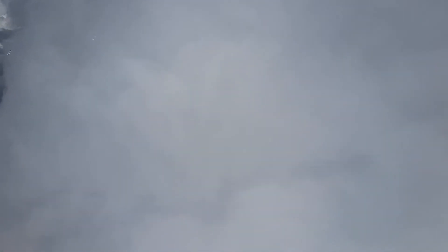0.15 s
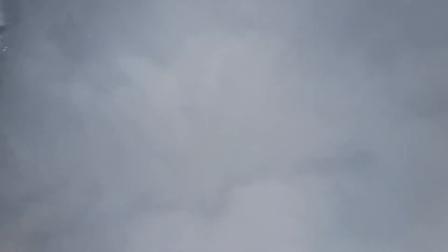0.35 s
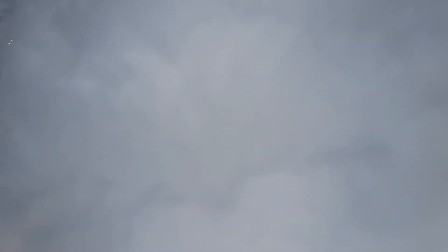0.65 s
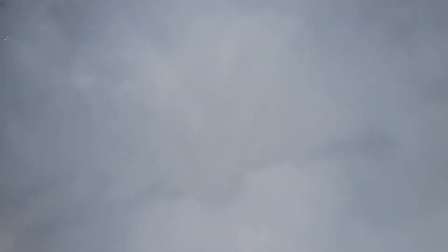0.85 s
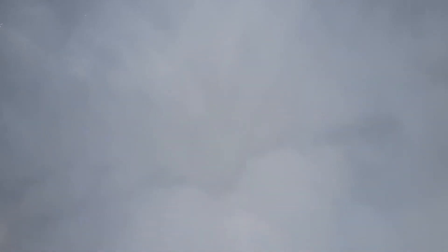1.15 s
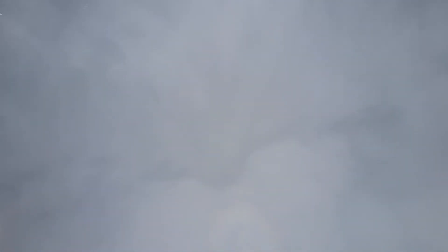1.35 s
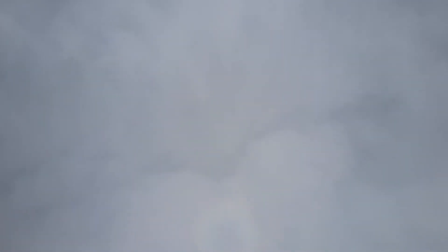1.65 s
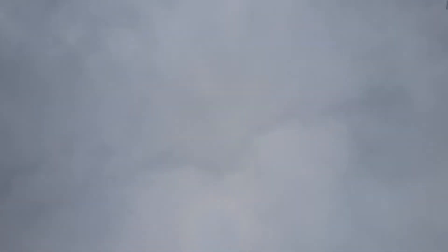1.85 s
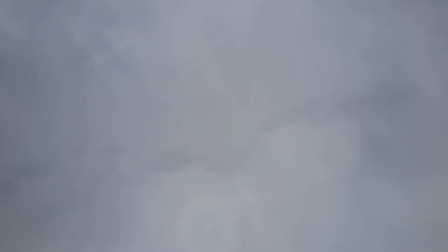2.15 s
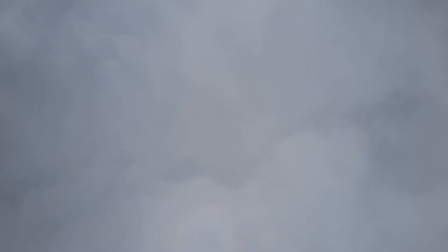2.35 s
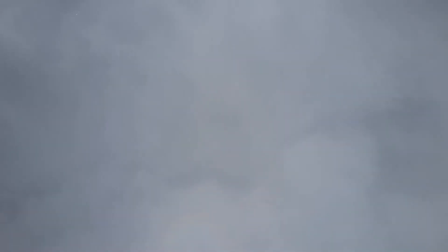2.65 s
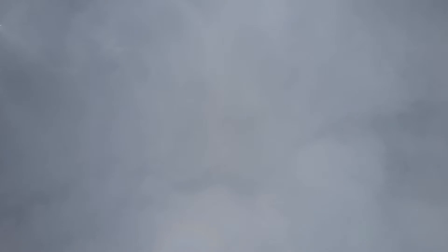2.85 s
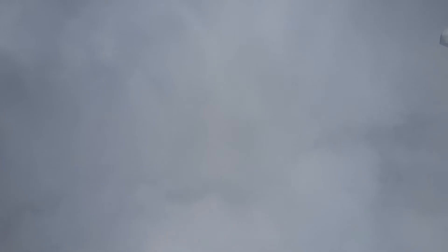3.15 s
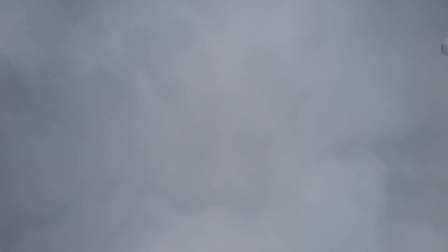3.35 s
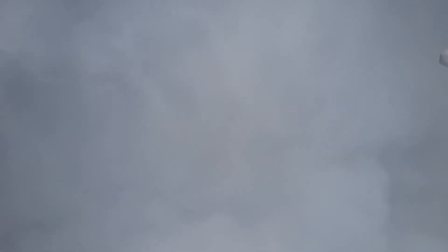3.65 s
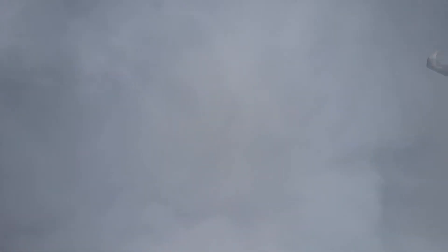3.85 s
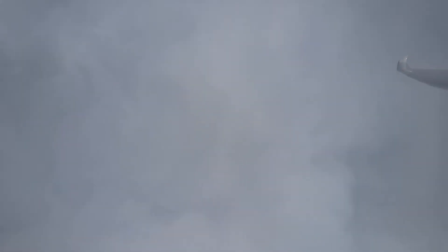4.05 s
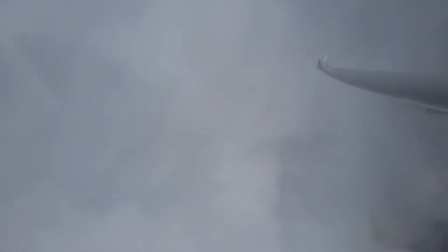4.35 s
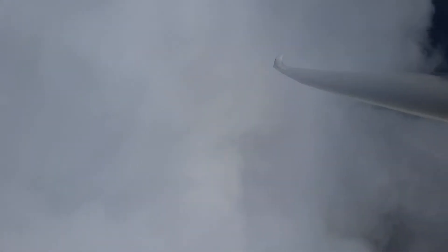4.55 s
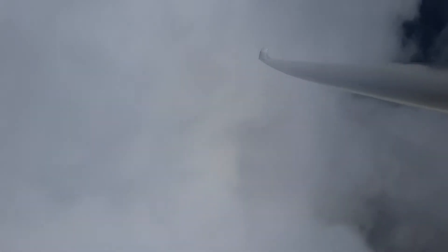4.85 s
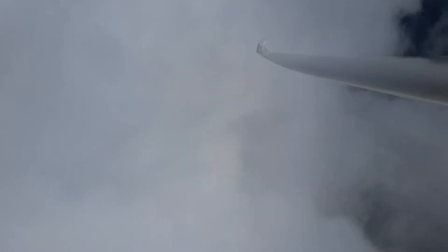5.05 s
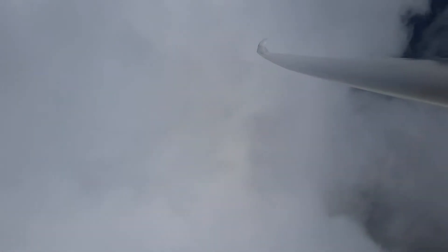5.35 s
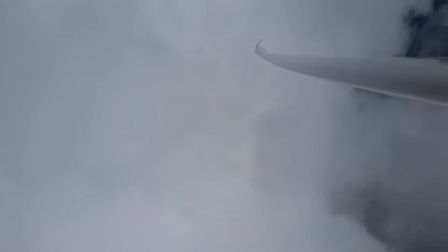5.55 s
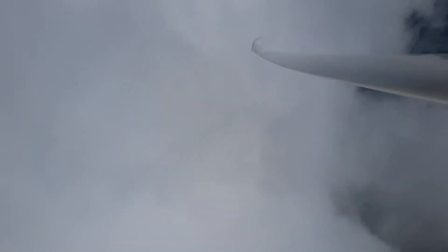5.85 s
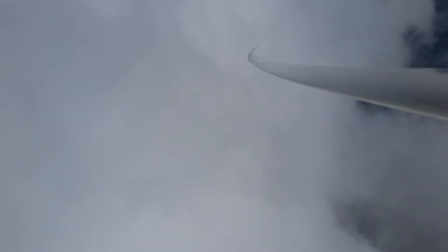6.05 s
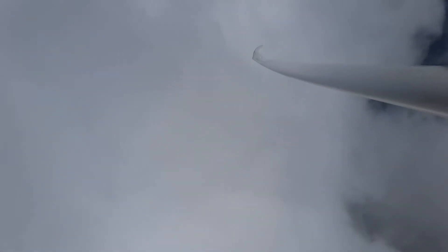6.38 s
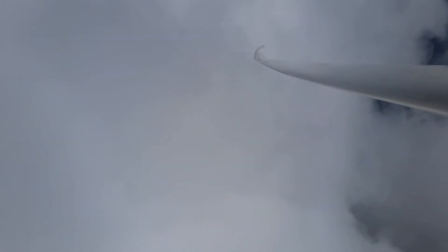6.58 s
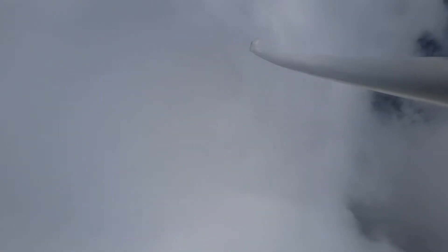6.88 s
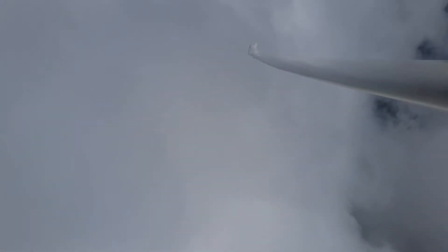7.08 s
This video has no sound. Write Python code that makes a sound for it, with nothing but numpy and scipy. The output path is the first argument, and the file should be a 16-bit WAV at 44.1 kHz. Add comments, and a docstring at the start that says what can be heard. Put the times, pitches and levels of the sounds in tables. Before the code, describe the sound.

Broad, steady wind noise surrounds a close stereo microphone in a small glider cabin, with humming, droning and rumbling beneath. A vent flap bangs shut, briefly ducking everything, and rattles slightly. The wind becomes quieter and duller for around a second, with one weaker knock, then swells back as the vent reopens with a tiny bright tick. The roar continues to the end.

```python
"""Inside a sailplane cockpit in flight, air roars over the canopy and hisses through a vent: shaped noise.
Turbulence drives the cabin's low resonances, noise in narrow bands that hums, drones and rumbles.
The vent flap knocks shut and rebounds, modes rung by short pushes, and the airflow sinks briefly.
It eases open again; the vent slide ticks twice, in tiny bursts of bright noise.
A fast limiter ducks everything under the loudest knock."""
import sys
import numpy as np
from scipy import signal
from scipy.fft import rfft, irfft
from scipy.io import wavfile
from scipy.ndimage import uniform_filter1d, minimum_filter1d

SR = 44100
rng = np.random.default_rng(int(sys.argv[2]) if len(sys.argv) > 2 else 0)


def wav_out(sig):
    """Save sig, one row per channel (or a flat mono array), as 16-bit PCM at SR to the path in sys.argv[1]."""
    wavfile.write(sys.argv[1], SR, np.round(np.clip(np.atleast_2d(sig).T, -1, 1) * 32767).astype(np.int16))


N = 318402
T, HZ = np.arange(N) / SR, np.fft.rfftfreq(N, 1 / SR)


def gain_of(db):
    """Decibels to amplitude."""
    return 10 ** (np.asarray(db) / 20)


def pan(db):
    """Left and right gains for a level difference, left minus right."""
    return gain_of([[db / 2], [-db / 2]])


def colour(points):
    """Gain at every frequency, joined in dB on a log frequency axis."""
    hz, db = np.transpose(points)
    return gain_of(np.interp(np.log(HZ + 1), np.log(hz), db))


def above(hz, order):
    """Gain of a high-pass."""
    return 1 / np.sqrt(1 + (hz / (HZ + 1)) ** (2 * order))


def white():
    """Spectrum of fresh noise with unit power per Hz."""
    return rfft(rng.standard_normal(N)) * np.sqrt(SR / 2)


def wander(rate_hz):
    """Slow random curve of unit deviation; its spectrum fades out around the given rate."""
    curve = irfft(white() * np.exp(-(HZ / rate_hz) ** 2), N)
    return curve / curve.std()


def swell(depth_db, rate_hz):
    """Gain that rises and falls at random with the turbulence."""
    return gain_of(depth_db * wander(rate_hz))


# the vent shuts quickly and reopens slowly
SHUT_AT_S, SHUT_TAKES_S = 1.954, 0.47
OPEN_AT_S, OPEN_TAKES_S = 2.834, 0.82


def eased(start_s, length_s):
    """A move from 0 to 1 that starts fast and settles gently."""
    progress = np.clip((T - start_s) / length_s, 0, 1)
    return 1 - (1 - progress) ** 2


def airflow(open_db, drop_db, growth_db_per_s):
    """Gain of a layer: it creeps up with airspeed and sinks while the vent is shut."""
    shut = eased(SHUT_AT_S, SHUT_TAKES_S) - eased(OPEN_AT_S, OPEN_TAKES_S)
    return gain_of(open_db - drop_db * shut + growth_db_per_s * T)


def steadied(spectra, share, smooth_s=0.062):
    """Flow-driven ringing saturates: its swells are partly evened out."""
    sound = irfft(spectra, N)
    power = uniform_filter1d((sound ** 2).mean(0), max(int(smooth_s * SR), 1))
    return sound * (power / power.mean()) ** (-np.clip(share, 0, 1) / 2)


# Cabin and shell resonances, before airflow and swells. Each row: centre in Hz, width in Hz,
# peak level in dB per Hz, left minus right in dB, left lead in radians (used above 170 Hz only).
CABIN_MODES = [(38.2, 30, -41, 3.5, -0.5), (53.2, 8.4, -45, 10.5, 0), (99, 16.8, -34.5, -2, -1),
               (116, 18, -35, 1, 0), (148.7, 29, -40, 3.5, 0), (194.5, 51, -48.5, -3, 0.5),
               (252, 74, -45, 1, 0.63), (311.4, 26, -39.5, 3, 0.3), (339, 59, -48, -1, 0.13),
               (431, 59, -53.5, 4.5, -1.1), (518, 58, -53.5, -3, 1.5), (670.4, 60, -53, 8, -3),
               (802, 81, -59.5, 9.5, 4), (880, 90, -71, -12.5, 2), (1097, 230, -68, 11.5, -3),
               (1416, 110, -73.5, 7, -1), (1497, 144, -68, 11, -0.4), (2185, 180, -85, 13, -0.5),
               (2760, 310, -81, -7, -0.4), (3357, 65, -78, -12, 0.5), (4780, 340, -89, 14, 1)]
# How each group follows the airflow: level with the vent open in dB, drop with it shut in dB,
# growth as the glider gathers speed in dB per second.
RUMBLE_FLOW = (0.2, 8.6, 0.01)
HUM_FLOW = (-0.78, 9.2, 0.34)
DRONE_FLOW = (1.3, 7.4, 0.0)
# Random swells from turbulence: depth in dB (standard deviation), rate in Hz where they fade out.
HUM_TURBULENCE = (1.94, 14)
DRONE_TURBULENCE = (1.44, 10.4)
# Slow, chance rise and fall of the drone near 311 Hz. Each row: time in seconds, gain in dB.
DRONE_RISE_AND_FALL = [(0, 3), (1.7, -2.5), (4.7, -1.5), (5.0, 2.5), (6.1, 1), (6.6, -3), (7.2, 2.5)]


def cabin(rumble_cut_hz=24, hum_steadiness=1.0, drone_steadiness=0.3, rest_steadiness=0.085):
    """Turbulence drives each resonance as narrow noise, out of step between the sides above 170 Hz."""
    hum, drone, rest = np.zeros((3, 2, len(HZ)), complex)
    for hz, width, db, side_db, lead in CABIN_MODES:
        ring = white() * gain_of(db) / (1 + 2j * (HZ - hz) / width) ** 2
        if 72 < hz < 170:
            group = hum
        elif 285 < hz < 323:
            group = drone
        else:
            group = rest
        skew = lead * (hz > 170)  # long waves reach both sides in step
        group += ring * pan(side_db) * np.exp(.5j * skew * np.array([[1], [-1]]))
    # the hum and the drone also swell at random, each on its own
    hum = steadied(hum, hum_steadiness) * airflow(*HUM_FLOW) * swell(*HUM_TURBULENCE)
    drone = steadied(drone, drone_steadiness) * airflow(*DRONE_FLOW) * swell(*DRONE_TURBULENCE)
    drone *= gain_of(np.interp(T, *np.transpose(DRONE_RISE_AND_FALL)))
    rest = steadied(rest * above(rumble_cut_hz, order=4), rest_steadiness) * airflow(*RUMBLE_FLOW)
    return hum + drone + rest


# Echoes off the canopy and side walls, before the lining dulls them.
# Each row: channel (0 left, 1 right), delay in seconds, level in dB.
WALL_ECHOES = [(0, .0029, -20), (0, .0066, -19), (0, .0113, -22), (1, .0031, -21), (1, .0047, -19),
               (1, .0094, -21)]


def walls(dull_hz=4500):
    """Frequency response of the short echoes on each side; the lining soaks up their treble."""
    response = np.ones((2, len(HZ)), complex)
    lining = 1 / (1 + (HZ / dull_hz) ** 4)
    for channel, delay, db in WALL_ECHOES:
        response[int(channel)] += gain_of(db) * np.exp(-2j * np.pi * HZ * delay) * lining
    return response


# Rush of air on each side, before trim, echoes and airflow. Each row: frequency in Hz, level in dB per Hz.
LEFT_AIR = [(550, -49), (800, -58.5), (960, -60.0), (1550, -54.5), (2400, -67.5), (2800, -68.5),
            (4100, -76.5), (6100, -85), (7700, -85), (8900, -77), (11000, -79.5), (12000, -81.5),
            (15700, -83.5)]
RIGHT_AIR = [(550, -47), (640, -56), (760, -65), (900, -87), (1050, -68), (1600, -67.5), (2050, -70.5),
             (3200, -80), (4800, -82.5), (6200, -90), (8200, -99), (10000, -98), (12500, -89.5),
             (15600, -79.5)]
# Trim on the rush that leaves room for the resonances. Each row: frequency in Hz, gain in dB.
AIR_TRIM = [(100, -3.5), (450, -3.5), (650, -3.5), (900, -1.5), (1500, -5), (2400, -2), (2800, 0.5),
            (4000, 0)]
# How roar and hiss follow the airflow: level with the vent open in dB, drop with it shut in dB,
# growth as the glider gathers speed in dB per second.
ROAR_FLOW = (0.3, 9.4, 0.01)
HISS_FLOW = (-0.3, 12, 0.22)


def rush(low_hz=190, hiss_hz=5600, eddy_db=0.48, flutter_db=0.66):
    """Air noise, unrelated on the two sides: a roar over the canopy and a hiss from the vent."""
    air = np.array([white() * colour(LEFT_AIR), white() * colour(RIGHT_AIR)])
    air *= above(low_hz, order=2) * colour(AIR_TRIM) * walls()
    treble = above(hiss_hz, order=8) ** 2
    roar = irfft(air * (1 - treble), N) * airflow(*ROAR_FLOW) * swell(eddy_db, rate_hz=42)
    hiss = irfft(air * treble, N) * airflow(*HISS_FLOW) * swell(flutter_db, rate_hz=30)
    return roar + hiss


# Ticks of the vent slide. Each row: start in seconds, level in dB, centre in Hz,
# time to fall 60 dB in seconds, left minus right in dB.
SLIDE_TICKS = [(3.15, -27, 13700, .018, -3.5), (6.62, -40, 14500, .012, 0)]


def ticks(width_hz=4800):
    """Tiny slips of plastic on plastic: bands of bright noise that start at once and die away."""
    out = np.zeros((2, N))
    for s, db, hz, t60, side_db in SLIDE_TICKS:
        band = np.exp(-(2 * (HZ - hz) / width_hz) ** 2 / 2)
        fizz = irfft(np.array([white(), white()]) * band, N)
        decay = (T >= s) * gain_of(db - 60 * abs(T - s) / t60)
        out += fizz / fizz.std() * pan(side_db) * decay
    return out


# What the flap and canopy ring with, before the push shapes it.
# Each row: frequency in Hz, level in dB, time to fall 60 dB in seconds.
FLAP_MODES = [(125, -16, .1), (205, -11, .07), (250, 0, .018), (350, -9, .04), (490, -9, .02),
              (850, -13, .012)]
# Knocks of the vent flap and its rebounds. Each row: start in seconds, gain in dB, contact time
# constant in seconds, crack in dB relative to that gain and before its low-pass, left minus right in dB.
FLAP_KNOCKS = [(1.9781, 10, .0008, -4, -3), (2.0065, -7, .0012, -38, -3), (2.0155, -7, .0012, -38, -3),
               (2.0505, -9, .0012, -38, -3), (2.5958, -2.5, .001, -37, -5)]
CRACK_HZ, CRACK_T60_S = 2700, .0065  # low-pass cutoff, time to fall 60 dB


def knocks():
    """A short push and pull rings the flap; hard contact adds a dull crack."""
    out, t = np.zeros((2, N)), T[:SR // 4]
    ring = sum(gain_of(db - 60 * t / t60) * np.sin(2 * np.pi * hz * t) for hz, db, t60 in FLAP_MODES)
    dull = signal.butter(4, CRACK_HZ, fs=SR, output="sos")
    for s, db, contact, crack_db, side_db in FLAP_KNOCKS:
        push = (t / contact - 1) * np.exp(-t / contact)
        body = signal.fftconvolve(ring, push / abs(push).sum())[:len(t)]
        burst = rng.standard_normal(len(t)) * gain_of(crack_db - 60 * t / CRACK_T60_S)
        crack = signal.sosfilt(dull, burst)
        out[:, round(s * SR):][:, :len(t)] += gain_of(db) * pan(side_db) * (body + crack)
    return out


def scene():
    """Cabin resonances, rush of air and the sounds of the vent."""
    return cabin() + rush() + ticks() + knocks()


def record(dry, threshold_db=1.5, recovery_db_per_s=420, ceiling=.98, edge_hz=15850):
    """A fast limiter ducks the peaks and recovers steadily; then soft clipping and a treble limit."""
    over_db = np.maximum(20 * np.log10(abs(dry).max(0) + 1e-9) - threshold_db, 0)
    fall = T * recovery_db_per_s
    duck_db = np.maximum.accumulate(over_db + fall) - fall
    # start each duck just ahead of its peak, with a smooth slope
    early_db = uniform_filter1d(minimum_filter1d(-duck_db, size=128), size=128)
    held = dry * gain_of(early_db)
    rounded = held / (1 + (held / ceiling) ** 8) ** (1 / 8)
    lowpass = signal.firwin(511, edge_hz, window=("kaiser", 9), fs=SR)
    return signal.oaconvolve(rounded, lowpass[None], "same")


dry = scene()
out = record(dry)
wav_out(out)
```